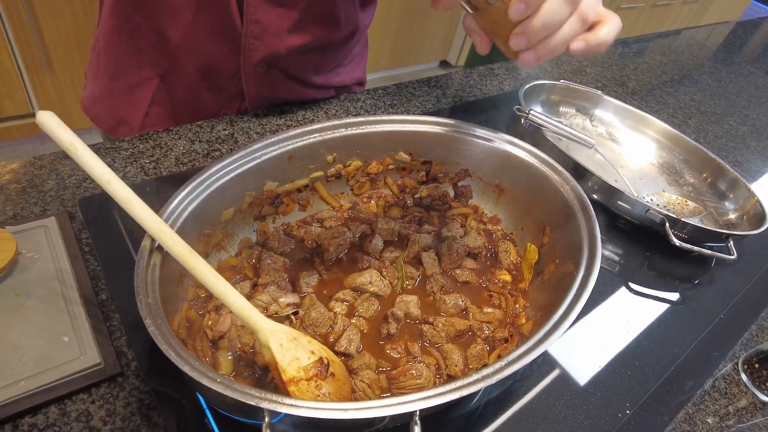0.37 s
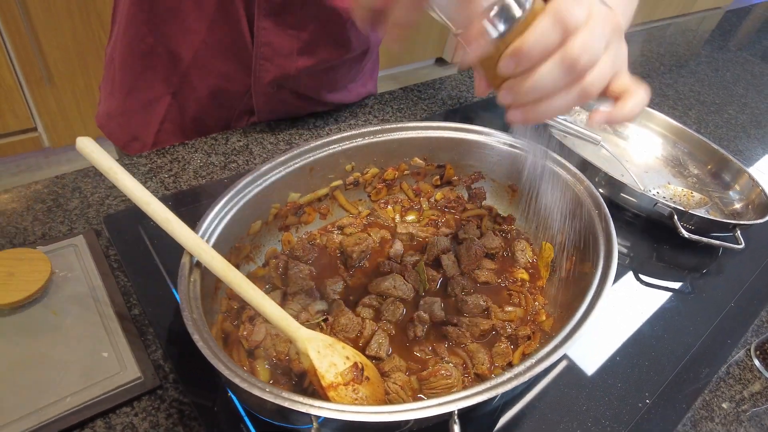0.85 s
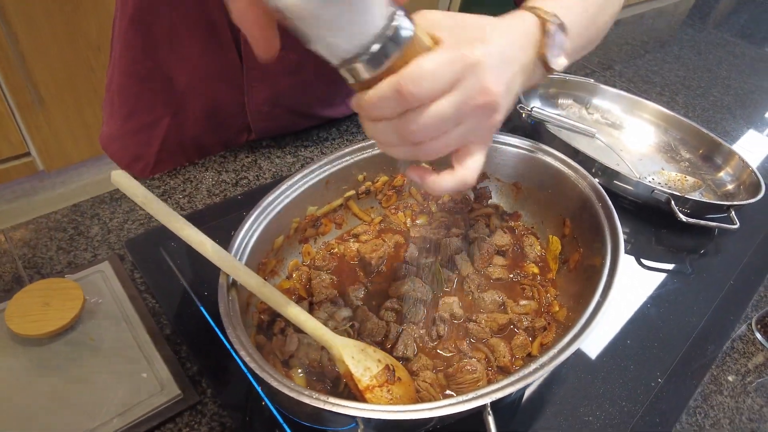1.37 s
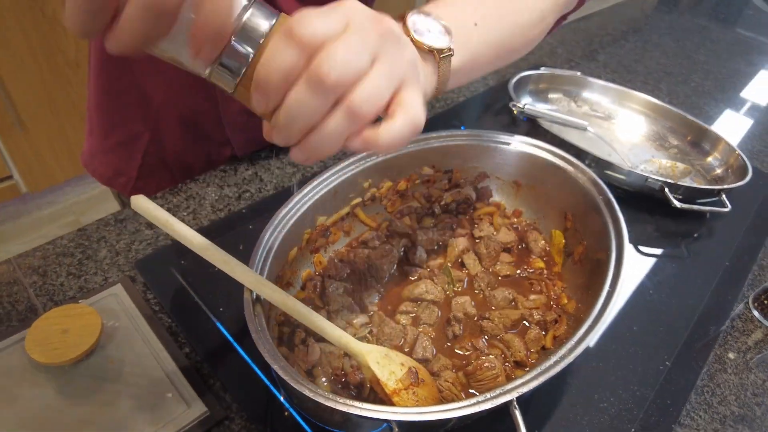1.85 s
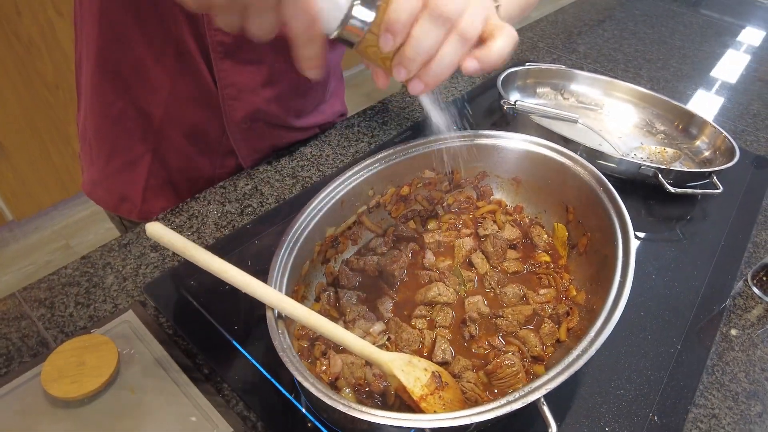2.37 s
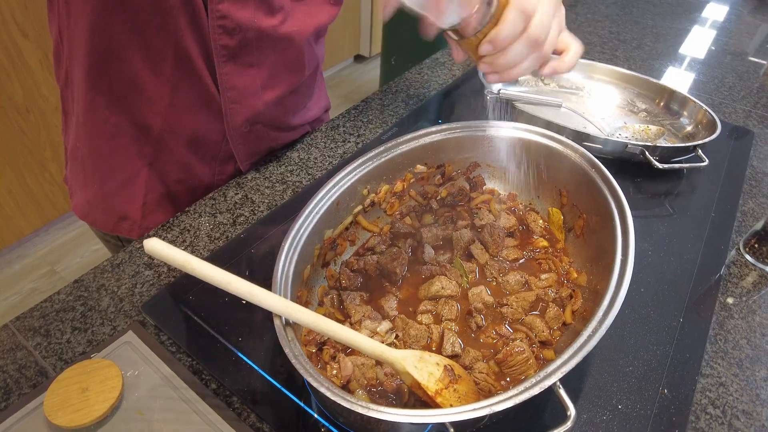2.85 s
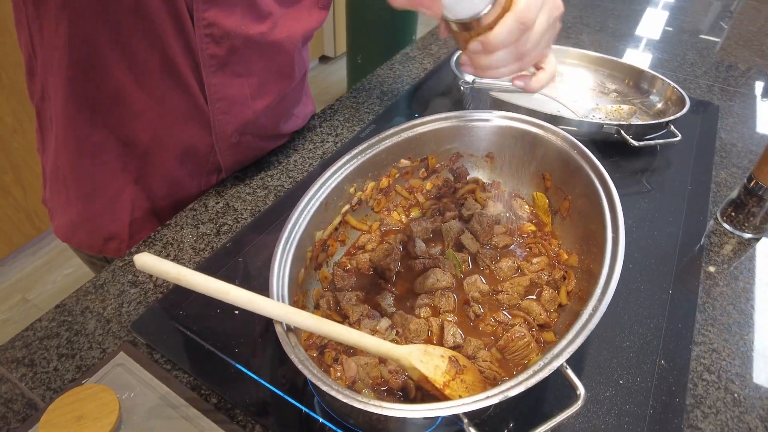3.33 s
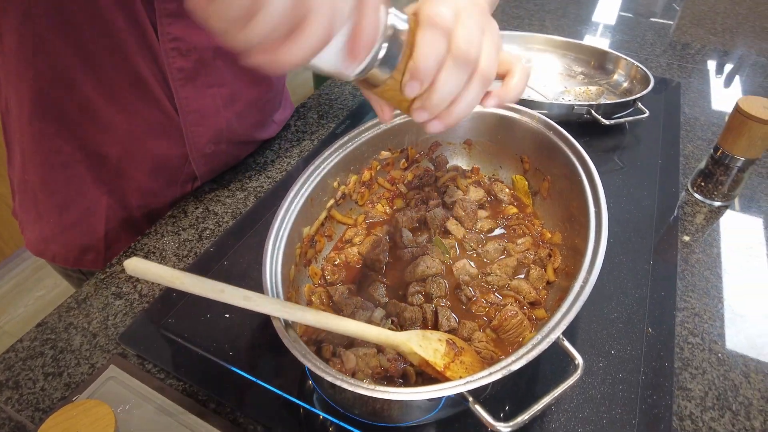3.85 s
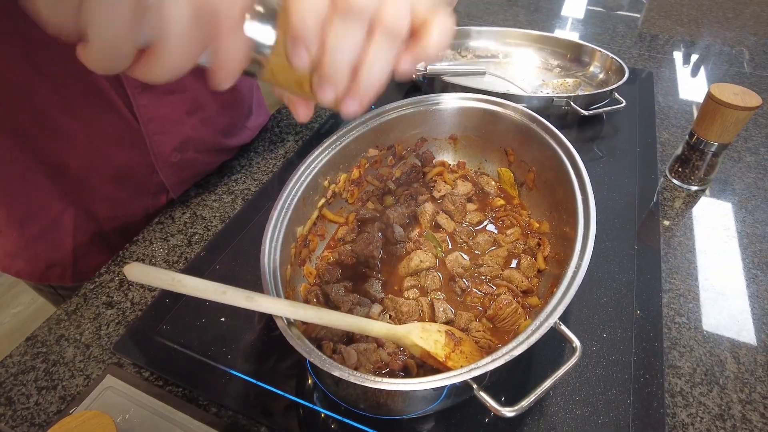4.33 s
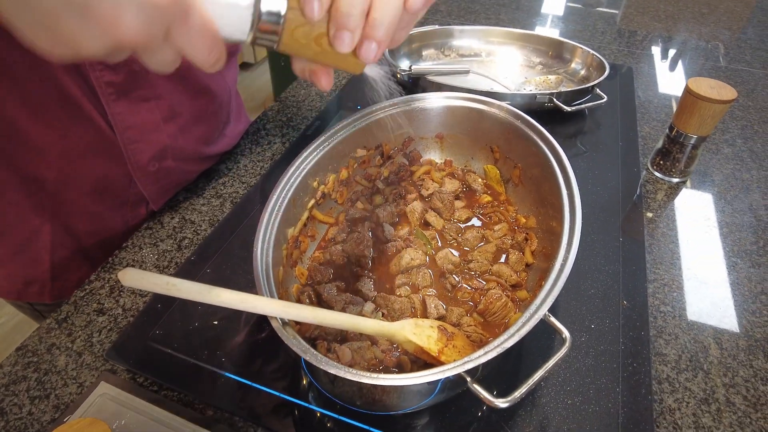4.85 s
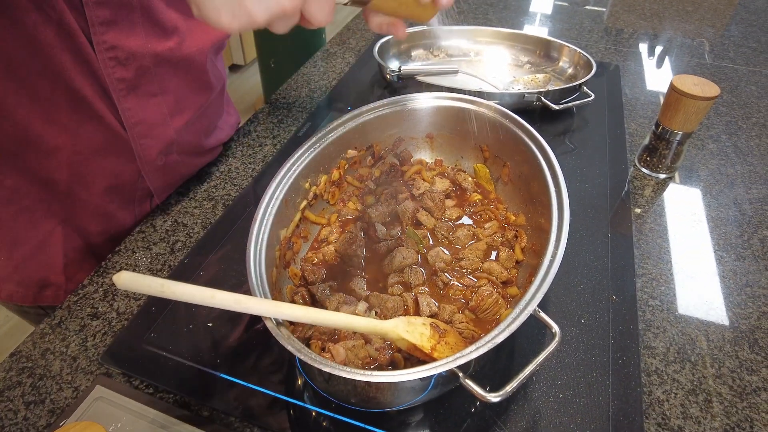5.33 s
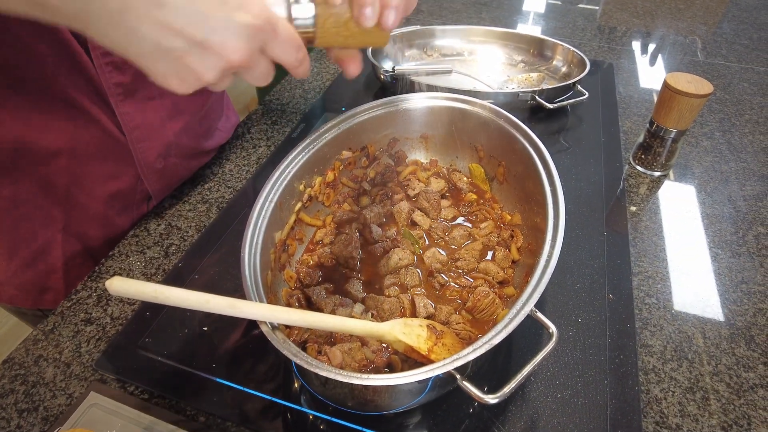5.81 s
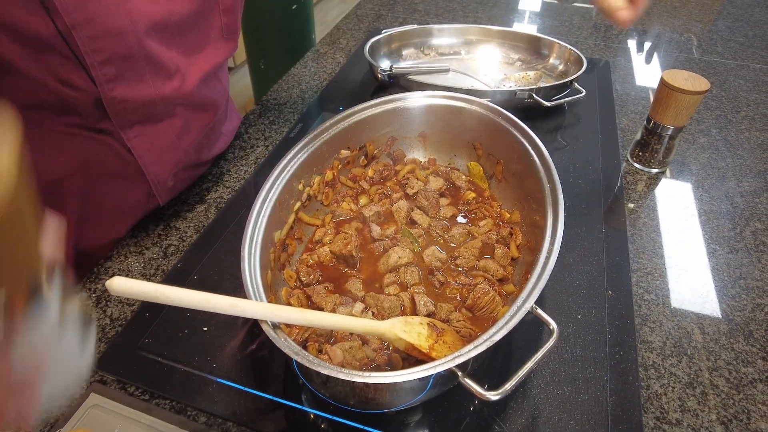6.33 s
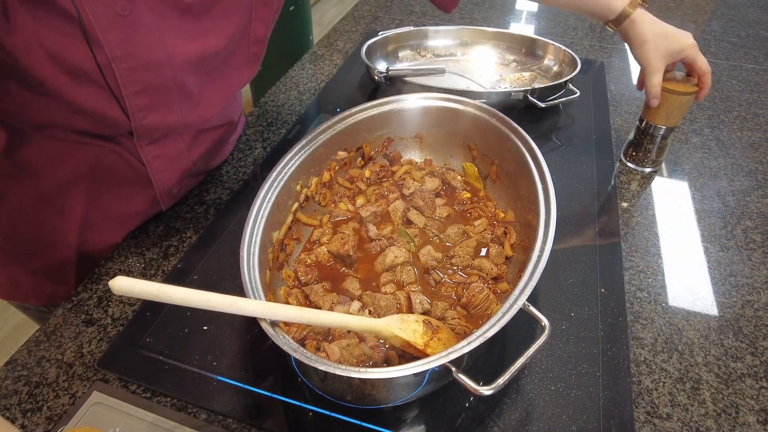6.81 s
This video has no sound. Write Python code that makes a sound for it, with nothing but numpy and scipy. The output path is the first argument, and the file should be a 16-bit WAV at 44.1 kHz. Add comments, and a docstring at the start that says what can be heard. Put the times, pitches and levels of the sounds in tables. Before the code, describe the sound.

Rhythmic crackling strokes of a hand-turned salt grinder, thin finger hisses and loose grain ticks between, ending in a hard knock on a worktop.

```python
"""In a kitchen, a hand twists a salt mill in short strokes over a pot, under the steady airy rush of a cooker hood.
Crystals crack in the burr: bursts of noise that ring the mill's low, middle and bright resonances.
Between strokes the fingers slide back with a thin hiss; loose salt shifts, ticks and trickles as small
taps and pings, and a few narrow scrapes are bands of noise. At the end the mill is set down on
a hard worktop with a hollow knock, built from decaying sines; a short room tail answers mill and knock."""
import sys
import numpy as np
from scipy import signal
from scipy.fft import rfft, irfft, next_fast_len
from scipy.io import wavfile
from scipy.ndimage import uniform_filter1d, map_coordinates

SR = 44100
rng = np.random.default_rng(int(sys.argv[2]) if len(sys.argv) > 2 else 0)


def decibels_to_gain(level_db):
    """Convert a level in decibels to a linear amplitude gain (20 dB per decade)."""
    exponent = np.asarray(level_db, float) / 20
    return 10 ** exponent


def wav_out(sig):
    """Save sig, one row per channel (or a flat mono array), as 16-bit PCM at SR to the path in sys.argv[1]."""
    wavfile.write(sys.argv[1], SR, np.round(np.clip(np.atleast_2d(sig).T, -1, 1) * 32767).astype(np.int16))


N = 306054

# spectrum of the hood's air noise, relative: f/Hz, level/dB
HOOD_SPECTRUM = [(15, -49), (25, -9), (127, -2.5), (249, -3.5), (531, 0.5), (754, -10), (1130, -6),
                 (1260, -15.5), (1650, -11), (1790, -15), (3520, -17.5), (3920, -19), (6380, -23),
                 (14800, -34), (16000, -33)]
# how long the room holds each frequency: f/Hz, time to fall 60 dB/s
ROOM_DECAY = [(150, .2), (400, 0.51), (1000, 0.47), (3000, 0.33), (10000, 0.21)]
# the base lands and rocks: t/s, level/dB
LANDINGS = [(6.7398, -10), (6.7431, -19.5), (6.7478, -40)]
# partials of the hollow knock, relative to each landing: f/Hz, level/dB, time to fall 60 dB/s
HOLLOW_PARTIALS = [(238, -17, 0.067), (263, -19, 0.22), (311, -22, 0.62), (526, -21.5, .15),
                   (557, -14.5, 0.097), (650, -21.5, 0.026), (758, 6, 0.027), (967, 5, 0.035),
                   (946, -25, 0.35), (1010, -29, 0.25), (1075, -18, .15), (1150, -23, .03),
                   (1540, -1, 0.022), (1773, -0.5, 0.02), (1990, -7, 0.017), (2280, -23, .02),
                   (2790, -8, 0.017), (5100, -25, 0.012), (8000, -31, .008)]
# brief scrapes: middle t/s, half length/s, f/Hz, width/Hz, level/dB
SCRAPES = [(0.606, 0.014, 5450, 500, -50), (3.352, 0.0067, 5300, 500, -42.5),
           (5.737, 0.038, 443, 60, -40.5)]
# the fingers slide back: loudest t/s, level/dB, time to rise 20 dB/s, time to fall 20 dB/s
SLIDES = [(0.24, -41.9, 0.026, 0.056), (0.616, -48.1, 0.035, 0.133), (1.018, -43.3, 0.037, 0.048),
          (1.396, -46.3, 0.018, 0.061), (1.795, -54.5, 0.058, 0.2), (2.172, -39.8, 0.017, 0.066),
          (2.572, -47.1, 0.034, 0.057), (2.97, -45.9, 0.03, 0.088), (3.359, -47.6, 0.036, 0.076),
          (3.777, -48.3, 0.038, 0.069), (4.198, -44.8, 0.052, 0.094), (4.657, -44.0, 0.03, 0.055),
          (5.094, -37.6, 0.032, 0.052), (5.561, -45.1, 0.034, 0.109), (5.886, -60.2, 0.111, 0.12),
          (6.171, -53.0, 0.11, 0.112), (6.419, -60.0, 0.053, 0.036)]
# bands of the skin's hiss, relative: f/Hz, width/Hz, level/dB
SKIN_BANDS = [(8900, 1600, 1), (12000, 1100, 6.5), (14300, 2700, -10)]
# the salt shifts: loudest t/s, body level/dB, bright ring over body/dB, time to rise 20 dB/s
SHIFTS = [(.088, -42, -2, .02), (.176, -53, 5, .008), (.26, -52, -12, .02), (.596, -51, -7, .016),
          (.88, -48, -2, .08), (.978, -46, 0, .004), (1.36, -62, 6, .01), (1.398, -58, 0, .03),
          (1.648, -41, -10, .03), (1.714, -55, -12, .008), (1.812, -41, -2, .012), (2.566, -54, 4, .03),
          (2.834, -41, -6, .045), (2.996, -43, -5, .008), (3.258, -54, -2, .08), (3.352, -58, 4, .05),
          (3.645, -46, -3, .03), (3.81, -52, -8, .08), (4.052, -48, -2, .1), (4.232, -46, -1, .02),
          (4.28, -50, 0, .04), (4.658, -58, 0, .05), (4.716, -40, -3, .008), (4.95, -46, -8, .05),
          (5.112, -45, 0, .01), (5.416, -46, -1, .08), (5.518, -50, 5, .006), (5.556, -50, -12, .02),
          (5.615, -52, -5, .1), (6.02, -49, -20, .012), (6.154, -58, 2, .05), (6.21, -45, -20, .007),
          (6.638, -55, -15, .1), (6.828, -55, -15, .1), (6.92, -57, -15, .1)]
# single cracks and ticks; rings relative to the tick, all levels before the balance in ticks():
# t/s, level/dB, f/Hz, low ring/dB, bright ring/dB
TICKS = [(0.0877, -26, 7460, -15, -16), (0.175, -26.5, 6800, -22, -9), (0.2324, -33, 12000, -20, -10),
         (0.2912, -25, 7800, -10, -7), (0.3067, -20, 4900, -9, -9), (0.3401, -12, 2790, -10, -15),
         (0.4008, -10, 7700, -5, -16), (0.5344, -37, 6090, -11, -18), (0.5494, -36, 5430, -14, -20),
         (0.5644, -45, 2360, -12, -7), (0.5938, -28, 5500, -20, -18), (0.6792, -23.5, 3820, -12, -15),
         (0.704, -13, 4660, -6, -14), (0.789, -22, 4740, -10, -14), (0.865, -25, 8900, -15, -1),
         (0.9757, -16, 11900, -26, -14), (1.0051, -30, 12000, -16, -13), (1.061, -24, 8310, -19, -15),
         (1.0715, -20, 8590, -7, -15), (1.0858, -17, 5250, -7, -16), (1.1714, -23, 2570, -8, -14),
         (1.3598, -36, 7600, -19, -16), (1.3967, -27, 11900, -23, -13), (1.4515, -18, 4670, -17, -13),
         (1.4724, -19, 4730, -13, -10), (1.486, -14.5, 2360, -19, -16), (1.4994, -17, 3470, -15, -17),
         (1.5302, -16, 2720, -15, -15), (1.542, -16, 4160, -18, -16), (1.6407, -26, 4850, -8, -14),
         (1.718, -33, 4300, -6, -15), (1.81, -20.5, 5150, -10, -11), (1.838, -17, 3210, -19, -9),
         (1.8492, -14, 8060, -3, -12), (2.1665, -38, 12000, -20, -11), (2.2342, -20, 4800, -12, -7),
         (2.2415, -13, 7600, -10, -12), (2.2456, -12, 7820, -18, -14), (2.2675, -13, 4400, -16, -16),
         (2.2821, -14, 3650, -14, -14), (2.5656, -27, 11600, -21, -12), (2.6207, -34, 4700, -11, -19),
         (2.661, -17, 3610, -11, -14), (2.814, -27, 2820, -13, -10), (2.9977, -25, 11500, -12, -5),
         (3.023, -15, 5150, -18, -10), (3.1495, -19, 4760, -14, -22), (3.2244, -36, 3640, -16, -17),
         (3.2495, -31, 8000, -17, -12), (3.3313, -32, 5460, -27, -12), (3.3543, -29, 5420, -27, -16),
         (3.402, -21, 8000, -12, -14), (3.4414, -14, 5140, -13, -19), (3.4763, -14.5, 4680, -11, -16),
         (3.5103, -9.5, 8300, -14, -11), (3.6386, -25, 8800, -15, -14), (3.7609, -36, 12000, -16, -11),
         (3.7874, -29.5, 6360, -11, -16), (3.8273, -25, 3470, -15, -5), (3.8564, -20, 8100, -15, -13),
         (4.0213, -31, 2450, -13, -12), (4.128, -35, 2900, -6, -12), (4.1894, -31, 9400, -24, -13),
         (4.2313, -25, 7950, -10, -14), (4.2675, -33, 4960, -14, -5), (4.2955, -20, 4760, -22, -14),
         (4.3838, -12, 3950, -15, -11), (4.4117, -16, 4450, -12, -20), (4.5057, -31.5, 7700, -16, -15),
         (4.549, -35, 2380, -15, -23), (4.5864, -42, 4280, -14, -17), (4.6054, -47, 2300, -12, -11),
         (4.6124, -45, 3070, -12, -2), (4.6229, -35, 7400, -18, -7), (4.639, -33, 12000, -18, -12),
         (4.7147, -26, 8310, -16, -11), (4.7527, -18, 2530, -17, -10), (4.7635, -15.5, 8000, -19, -9),
         (4.8235, -13, 2750, -14, -18), (4.8494, -15, 2440, -10, -18), (4.9512, -21, 8700, -20, -11),
         (5.0898, -34, 11800, -17, -11), (5.1094, -25, 12000, -9, -9), (5.1642, -22, 8500, -6, -14),
         (5.191, -18.5, 4790, -15, -11), (5.2894, -15, 2330, -7, -17), (5.3936, -34, 4890, -14, -12),
         (5.4096, -30, 9100, -12, -12), (5.5174, -21, 5200, -21, -8), (5.5374, -27, 11800, -14, -12),
         (5.6484, -13.5, 3700, -24, -20), (5.677, -15, 3580, -14, -16), (5.978, -39, 11500, -25, -20),
         (6.0187, -28, 2600, -11, -27), (6.1, -36, 3020, -5, -16), (6.1454, -34, 12000, -6, -14),
         (6.2103, -30, 2280, -10, -22), (6.3245, -43, 3570, -3, -18), (6.389, -39, 2630, -10, -9),
         (6.4145, -38, 11000, -25, -8), (6.4492, -36, 7000, -20, -14), (6.5475, -38, 3100, -5, -28),
         (6.588, -38, 3140, -12, -18), (6.6283, -36, 2980, -11, -11), (6.6444, -34, 7500, -25, -11),
         (6.714, -29, 2790, -3, -27), (6.8354, -35, 2300, -8, -18), (6.8818, -28, 4500, -10, -25),
         (6.912, -41, 2380, -10, -14)]
# the mill's resonances in three groups, relative: f/Hz, width/Hz, level/dB
MILL_LOW = [(1205, 270, -0.5), (1478, 320, 2), (1750, 440, 3), (2033, 450, -1), (2350, 220, -4)]
MILL_MID = [(2855, 400, -1.5), (3423, 420, -0.5), (3900, 660, -2.5), (4400, 620, -1), (4980, 880, 0.5)]
MILL_BRIGHT = [(7260, 1400, 4), (8360, 1050, 5.5), (9400, 710, 0.5), (10760, 740, -2), (12200, 1900, -1),
               (14600, 1300, -16)]
# the hands round the mill, relative: f/Hz, width/Hz, level/dB
HANDS = [(192, 290, -4), (413, 460, 1), (767, 260, 0.5)]
# one list per twist of the wrist; coarseness is the power share of the low ring from big crystals:
# t/s, relative effort level/dB, coarseness/dB, favoured low f/Hz
TWISTS = [
    [(0.0, -29, -6, 1490), (0.018, -31, -5, 1530), (0.06, -49, -3, 1690)],
    [(0.27, -51, -5, 1630), (0.312, -34, -5, 1620), (0.362, -25, -5, 1660), (0.394, -30, -6, 1690),
     (0.4, -24, -4, 1690), (0.45, -51, -3, 1750)],
    [(0.665, -56, -8, 1710), (0.703, -28, -7, 1730), (0.787, -27, -2, 1670), (0.809, -38, -7, 1730),
     (0.83, -47, -1, 1750)],
    [(1.045, -50, -1, 1680), (1.061, -40, -6, 1670), (1.091, -29, -3, 1690), (1.133, -26, -4, 1770),
     (1.161, -38, -5, 1750), (1.177, -29, -3, 1660), (1.23, -49, -2, 1650)],
    [(1.445, -51, -13, 1720), (1.449, -40, -8, 1720), (1.487, -27, -5, 1680), (1.541, -27, -4, 1680),
     (1.569, -32, -5, 1620), (1.6, -48, -2, 1580)],
    [(1.83, -53, -8, 1570), (1.836, -38, -6, 1560), (1.854, -32, -10, 1560), (1.86, -30, -3, 1580),
     (1.946, -29, -5, 1700), (1.98, -48, -2, 1760)],
    [(2.22, -52, -19, 1710), (2.238, -27, -2, 1720), (2.274, -27, -5, 1570), (2.336, -28, -3, 1620),
     (2.38, -48, -3, 1690)],
    [(2.62, -44, -13, 1600), (2.658, -28, -4, 1580), (2.704, -30, -8, 1750), (2.752, -30, -6, 1650),
     (2.79, -49, -5, 1690)],
    [(3.015, -49, -2, 1620), (3.021, -33, -10, 1610), (3.041, -34, -6, 1560), (3.123, -30, -4, 1890),
     (3.155, -32, -2, 1930), (3.163, -46, -3, 1920), (3.18, -47, -2, 1910)],
    [(3.4, -42, -6, 1780), (3.426, -40, -9, 1760), (3.44, -32, -5, 1670), (3.488, -28, -5, 1670),
     (3.548, -30, -4, 1850), (3.59, -49, -5, 1830)],
    [(3.81, -52, -4, 1620), (3.834, -39, -6, 1560), (3.848, -43, -14, 1540), (3.862, -31, -6, 1530),
     (3.904, -28, -3, 1790), (3.958, -28, -4, 1800), (4.0, -47, -4, 1660)],
    [(4.29, -46, -14, 1550), (4.294, -35, -15, 1550), (4.314, -32, -6, 1620), (4.38, -28, -7, 1570),
     (4.41, -29, -4, 1640), (4.47, -49, -3, 1660)],
    [(4.73, -42, -13, 1850), (4.738, -46, -10, 1840), (4.754, -31, -6, 1770), (4.786, -29, -5, 1570),
     (4.822, -26, -3, 1650), (4.86, -31, -2, 1570), (4.89, -46, -3, 1540)],
    [(5.16, -46, -6, 1640), (5.234, -28, -9, 1610), (5.288, -25, -2, 1660), (5.32, -27, -3, 1770),
     (5.37, -46, -4, 1710)],
    [(5.62, -44, -4, 1720), (5.644, -36, -4, 1710), (5.65, -33, -15, 1700), (5.666, -42, -16, 1770),
     (5.702, -25, -7, 1770), (5.726, -25, -4, 1640), (5.774, -32, -4, 1550), (5.81, -48, -2, 1530)],
]


def unit(x):
    """Scaled to rms 1."""
    return x / np.sqrt(np.mean(x ** 2) + 1e-20)


def along(points, hz):
    """(Hz, value) points read on a log frequency axis."""
    f, v = np.transpose(points)
    return np.interp(np.log(hz + 1), np.log(f + 1), v)


def wobble(rate):
    """A smooth random curve, rate knots a second."""
    knots = rng.standard_normal(int(N * rate / SR) + 4)
    return map_coordinates(knots, [np.arange(N) * rate / SR])


def filtered(x, response):
    """x times a complex response of frequency."""
    m = next_fast_len(N + 8192)
    return irfft(rfft(x, m) * response(np.fft.rfftfreq(m, 1 / SR)), m)[:N]


def ringing(x, modes):
    """x through parallel damped resonances of alternating sign."""
    def response(f):
        return sum((-1) ** k * decibels_to_gain(db) * 1j * f * width / (hz * hz - f * f + 1j * f * width)
                   for k, (hz, width, db) in enumerate(modes))
    return filtered(x, response)


def sharp(x, mode):
    """One resonance with steep flanks, at its level."""
    hz, width, db = mode
    narrow = ringing(x, [(hz, width, 0)])
    return decibels_to_gain(db) * unit(ringing(narrow, [(hz, 4.3 * width, 0)]))


def cracks(per_second, spread_db):
    """Sizes of sudden breaks at random moments: many small, a few large."""
    chance, size = rng.random(N), rng.exponential(size=N)
    return (chance < per_second / SR) * decibels_to_gain(spread_db * np.minimum(size, 5))


def swells(s, db, rise_s, fall_s):
    """Gain that climbs to db at each s and falls again, 20 dB in the given times; the loudest counts."""
    late = np.arange(N) / SR - np.asarray(s)[:, None]
    pace = np.where(late < 0, -np.reshape(rise_s, (-1, 1)), np.reshape(fall_s, (-1, 1)))
    return decibels_to_gain((np.asarray(db)[:, None] - 20 * late / pace).max(axis=0))


def hood():
    """Air noise with a fixed colour, a little unsteady in level."""
    air = filtered(rng.standard_normal(N), lambda hz: decibels_to_gain(along(HOOD_SPECTRUM, hz)))
    return decibels_to_gain(-50.5 + 1.34 * wobble(8.6)) * unit(air)


def kitchen(x):
    """Each frequency of the room's answer dies at its own speed; little bass comes back."""
    hz, t, z = signal.stft(rng.standard_normal(SR // 2), SR, nperseg=256)
    fading = z * decibels_to_gain(-60 * t / along(ROOM_DECAY, hz)[:, None])
    tail = signal.istft(fading, SR, nperseg=256)[1]
    late = np.pad(x, (600, 0))  # samples before the room answers
    wet = signal.fftconvolve(late, tail / np.linalg.norm(tail))[:N]
    return filtered(wet, lambda f: (1j * f / (350 + 1j * f)) ** 2)


def knock():
    """The mill's base lands on the worktop and rocks twice, each blow a cluster of dying sines."""
    t = np.arange(N) / SR
    sound = np.zeros(N)
    for s, db in LANDINGS:
        start = round(s * SR)
        age = np.maximum(t[start:] - s, 0)
        ring = sum(decibels_to_gain(level - 60 * age / t60) * np.sin(2 * np.pi * hz * age)
                   for hz, level, t60 in HOLLOW_PARTIALS)
        onset = 1 - np.exp(-age / 0.00044)  # softens the very first edge
        sound[start:] -= decibels_to_gain(db) * ring * onset
    return filtered(sound, lambda hz: (1j * hz / (170 + 1j * hz)) ** 3)  # a small base radiates no deep bass


def scrapes():
    """Brief narrow scrapes: noise in one resonance under a smooth swell."""
    t = np.arange(N) / SR
    sound = np.zeros(N)
    for s, length, hz, width, db in SCRAPES:
        swell = decibels_to_gain(db) * np.exp(-((t - s) / length) ** 4)
        sound += swell * unit(ringing(rng.standard_normal(N), [(hz, width, 0)]))
    return sound


def fingers():
    """Dry skin slides back over the smooth body with a thin, high hiss."""
    hiss = sum(sharp(decibels_to_gain(2.2 * wobble(150)) * rng.standard_normal(N), mode) for mode in SKIN_BANDS)
    return unit(hiss) * swells(*np.transpose(SLIDES))


def strays():
    """Single grains drop at random, each a tiny ping at its own pitch."""
    per_second, smallest_db = 45, -53
    middle_hz, spread_octaves = 5500, 0.9  # the spread goes each way
    when, size, pitch = rng.random((round(per_second * N / SR), 3)).T
    t = np.arange(200) / SR
    hz = middle_hz * 2 ** (spread_octaves * (2 * pitch - 1))
    level = decibels_to_gain(smallest_db - 4 * np.log(1 - 0.98 * size))  # many small, a few large
    pings = level[:, None] * np.sin(2 * np.pi * hz[:, None] * t) * decibels_to_gain(-60 * t / 0.005)
    where = (when * N).astype(int)[:, None] + np.arange(len(t))
    return np.bincount(where.ravel(), pings.ravel(), N)[:N]


def loose_salt():
    """Grains shift inside the mill and fall: small taps into the mill's resonances."""
    settle_db, settle_fall_s, settle_bright_db = -54, 0.25, -18  # after a twist; fall 20 dB; over body
    trickle_db, shift_fall_s = -69, 0.022  # middle of the constant trickle; fall 20 dB
    taps = (unit(cracks(900, spread_db=2.2)) + 0.74) * rng.standard_normal(N)
    body = unit(unit(ringing(taps, MILL_LOW)) + 0.59 * unit(ringing(taps, MILL_MID)))
    bright = unit(ringing(taps, MILL_BRIGHT))
    ends = [rows[-1][0] for rows in TWISTS]
    settling = swells(ends, np.full(len(ends), settle_db), 0.005, settle_fall_s)
    settling = settling + decibels_to_gain(trickle_db + 4 * wobble(15))
    s, db, bright_db, rise_s = np.transpose(SHIFTS)
    body_gain = settling + swells(s, db, rise_s, shift_fall_s)
    bright_gain = decibels_to_gain(settle_bright_db) * settling + swells(s, db + bright_db, rise_s, shift_fall_s)
    return body * body_gain + bright * bright_gain


def ticks():
    """Each tick is a short rough ring at its own pitch and a burst into the mill's resonances."""
    s, db, hz, low_db, bright_db = np.transpose(TICKS)
    t = np.arange(300) / SR
    noise = rng.standard_normal((len(s), len(t)))
    bursts = noise * decibels_to_gain(-60 * t / 0.0032)
    rough = 1 + 1.26 * uniform_filter1d(noise, size=9, axis=1)
    rings = np.sin(2 * np.pi * hz[:, None] * t) * decibels_to_gain(-60 * t / 0.0065) * rough
    where = (np.round(s * SR).astype(int)[:, None] + np.arange(len(t))).ravel()

    def laid(shapes, level_db):
        """Every tick at its moment and level."""
        return np.bincount(where, (shapes * decibels_to_gain(level_db)[:, None]).ravel(), N)[:N]

    low = ringing(laid(bursts, db + low_db + 11), MILL_LOW)
    mid = ringing(laid(bursts, db - 6), MILL_MID)
    bright = ringing(laid(bursts, db + bright_db + 6), MILL_BRIGHT)
    return laid(rings, db - 7.5) + low + mid + bright


def wrist():
    """Effort in dB (-150 between twists), low share of the power, grip pitch, progress of the twist 0-1."""
    t = np.arange(N) / SR
    effort_db, done = np.full(N, -150.), np.zeros(N)
    for rows in TWISTS:
        s, db = np.transpose(rows)[:2]
        now = (t >= s[0]) & (t < s[-1])
        effort_db[now] = np.interp(t[now], s, db)
        done[now] = (t[now] - s[0]) / (s[-1] - s[0])
    s, db, coarse_db, grip_hz = np.vstack(TWISTS).T
    coarse = np.clip(decibels_to_gain(2 * np.interp(t, s, coarse_db)), 0, 0.85)  # doubled dB: a share of power
    return effort_db, coarse, np.interp(t, s, grip_hz), done


def gripped(force, modes, best_hz, focus_db, own_db):
    """Each mode is shaken unevenly, and the grip favours modes near a moving pitch by focus_db an octave."""
    weight = np.array([decibels_to_gain(-np.minimum(focus_db * np.abs(np.log2(hz / best_hz)), 12))
                       for hz, width, db in modes])
    rings = [sharp(decibels_to_gain(own_db * wobble(50)) * force * rng.standard_normal(N), mode) for mode in modes]
    return unit(np.sum(weight * rings, axis=0) / np.linalg.norm(weight, axis=0))


def burr():
    """Crystals break in clumps and ring the mill; the hands shake with a dull rumble."""
    effort_db, coarse, grip_hz, done = wrist()
    clumps = decibels_to_gain(0.92 * wobble(200) + 0.59 * wobble(70))
    force = clumps * (unit(cracks(1200, spread_db=1.2)) + 0.85)
    low = gripped(force, MILL_LOW, grip_hz, focus_db=16.5, own_db=3.0)
    mid_hz = 3800 * 2 ** (0.1 * wobble(12))  # favoured mid pitch drifts, in octaves
    mid = gripped(force, MILL_MID, mid_hz, focus_db=8.5, own_db=3.0)
    bright = unit(sum(sharp(decibels_to_gain(1.5 * wobble(90)) * force * rng.standard_normal(N), mode)
                      for mode in MILL_BRIGHT))
    dull = decibels_to_gain(-15) * unit(ringing(force * rng.standard_normal(N), HANDS))
    # the fine crystals' balance moves slightly from the start of a twist to its end
    fine = mid * decibels_to_gain(-3.8 + 0.6 * done) + bright * decibels_to_gain(-4 - 0.2 * done)
    return decibels_to_gain(effort_db + 0.6) * ((low + dull) * np.sqrt(coarse) + fine * np.sqrt(1 - coarse))


def scene():
    """The mill is near; the knock is further off and wetter."""
    mill = fingers() + loose_salt() + strays() + ticks() + scrapes() + burr()
    blow = knock()
    near = mill + decibels_to_gain(-17.5) * kitchen(mill)
    far = blow + decibels_to_gain(-15) * kitchen(blow)
    return (near + far + hood())[None]


def low_pass(x):
    """Removes everything above the highest recorded frequency."""
    return signal.sosfilt(signal.butter(12, 16480, fs=SR, output="sos"), x)


def record(dry):
    """The microphone cuts the deep bass."""
    mix = filtered(dry[0], lambda hz: (1j * hz / (45 + 1j * hz)) ** 2)[None]
    return low_pass(mix)


dry = scene()
out = record(dry)
wav_out(out)
```